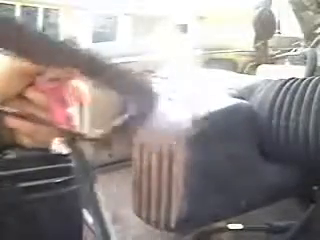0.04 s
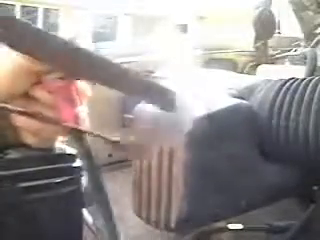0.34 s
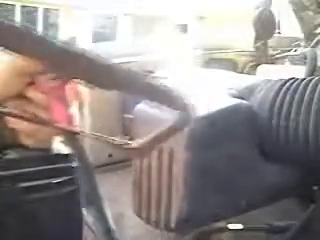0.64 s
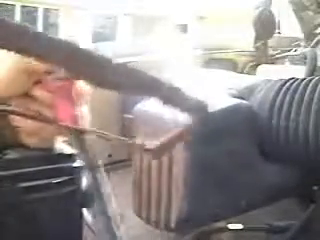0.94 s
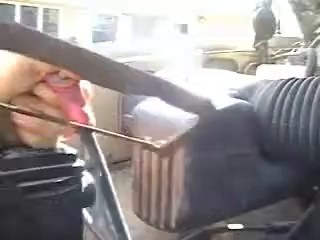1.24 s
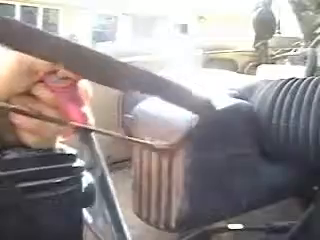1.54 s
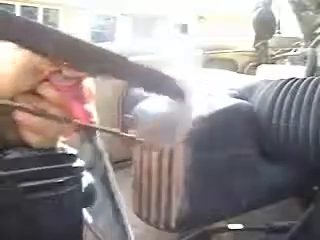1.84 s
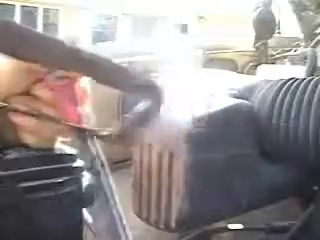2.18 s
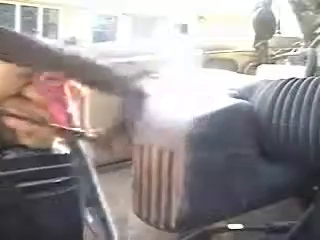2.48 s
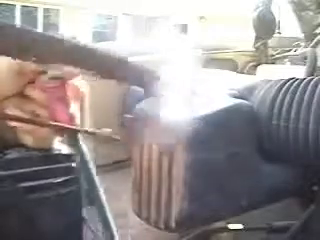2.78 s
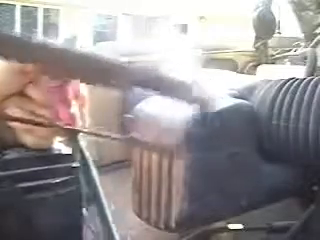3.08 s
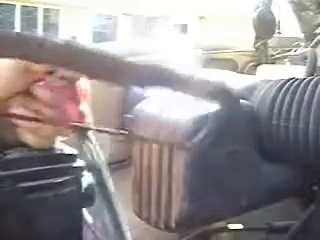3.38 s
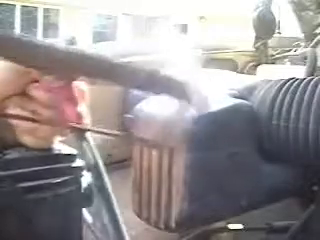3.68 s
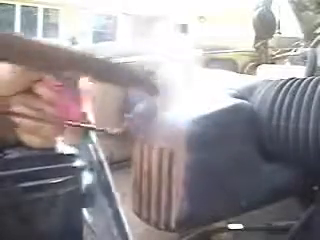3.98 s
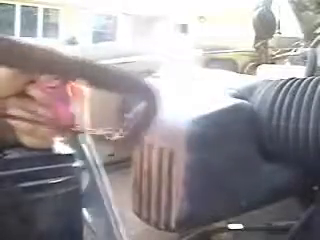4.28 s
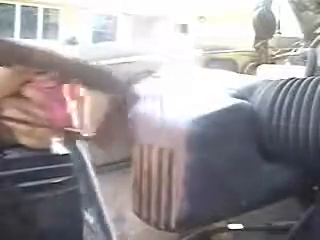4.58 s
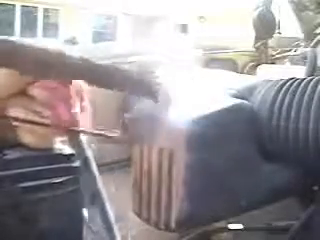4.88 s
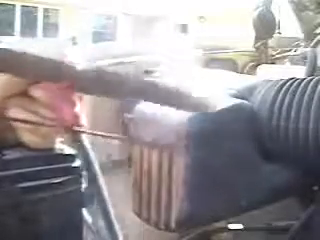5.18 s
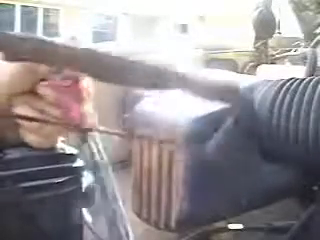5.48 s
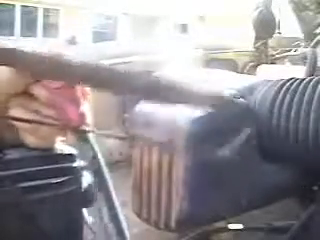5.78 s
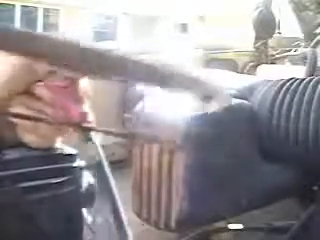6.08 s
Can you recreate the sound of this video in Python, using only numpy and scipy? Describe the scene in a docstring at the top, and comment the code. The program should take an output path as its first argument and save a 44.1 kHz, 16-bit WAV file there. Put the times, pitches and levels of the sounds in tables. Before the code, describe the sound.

A hand hacksaw cuts a steel cable fitting from the very start, close and straight ahead, about three strokes out and three back each second. The teeth make a gritty metallic rasp, with a low groan on the pulls. During the first three seconds the blade sticks at some turns and breaks free with thin, sudden scrapes. At about 0.4, 2.1 and 2.9 seconds the saw knocks a hollow plastic housing, which thuds and booms briefly, the last time more softly. Short high squeaks come near the start, just before 2 seconds, and around 5 to 6 seconds. The taut blade rings on after some strokes, most clearly near 1.9, 2.3 and 3.7 seconds. From 3 seconds the sawing runs evenly and a little louder, its high ring growing, until the end at about 6.5 seconds. Quiet driveway air and a faint hum lie underneath.

```python
"""Over quiet driveway air, a hand hacksaw cuts a steel cable fitting, about three strokes out and three
back each second. The teeth rasp through the resonances of the work, which squeaks now and then and
groans on the pulls; the taut blade sings on after some strokes. In the first three seconds the blade
sticks and scrapes free at some turns, and three times the frame knocks a hollow plastic housing, which
booms. The sawing carries on to the end, its strongest resonance growing as the cut deepens."""
import sys
import numpy as np
from scipy import signal
from scipy.fft import rfft, irfft
from scipy.io import wavfile
from scipy.ndimage import uniform_filter1d

SR = 44100
rng = np.random.default_rng(int(sys.argv[2]) if len(sys.argv) > 2 else 0)


def master_out(mix):
    """Clip the mix to full scale and print it as 16-bit PCM to the path in sys.argv[1]."""
    frames = np.transpose(np.atleast_2d(mix))
    ceiling = np.clip(frames, -1, 1)
    pcm = np.round(ceiling * 32767).astype(np.int16)
    wavfile.write(sys.argv[1], SR, pcm)


N = 279153
TIME = np.arange(N) / SR
BINS = np.fft.rfftfreq(N, 1 / SR)

# saw strokes, pull and push in turn: crest t/s, level/dB, length/s, body/dB (full or thin)
SAW_STROKES = [(0.006, -19, 0.073, -0.5), (0.205, -20.0, 0.074, 1), (0.362, -20, 0.073, 2.0),
               (0.555, -24.5, 0.077, -7), (0.72, -24.5, 0.082, 2.5), (0.894, -25.5, 0.084, -6),
               (1.047, -25.5, 0.097, 1), (1.227, -27, 0.091, -1.5), (1.372, -25, 0.1, 0.5),
               (1.567, -22, 0.086, 2.5), (1.711, -19, 0.08, -2), (1.915, -18, 0.077, 1),
               (2.059, -20, 0.092, 0.0), (2.259, -23, 0.097, 3), (2.43, -21, 0.08, -1.0),
               (2.632, -22.5, 0.078, -3), (2.771, -19.5, 0.11, 0.5), (2.975, -16.0, 0.1, -3),
               (3.141, -18, 0.074, 0.0), (3.338, -19.5, 0.092, 1.5), (3.488, -21.0, 0.091, 0.0),
               (3.689, -17, 0.091, 0.5), (3.845, -17.5, 0.076, -1.5), (4.023, -16, 0.077, -1.5),
               (4.184, -19.5, 0.083, -1.5), (4.369, -21.0, 0.087, 2), (4.513, -20.0, 0.072, -0.5),
               (4.693, -18.5, 0.084, 0.5), (4.845, -20.5, 0.1, -1.5), (5.039, -18.5, 0.086, 1),
               (5.19, -21.5, 0.1, -2), (5.387, -17.5, 0.088, 1), (5.547, -20, 0.1, -3.5),
               (5.742, -16.5, 0.085, 1), (5.897, -16.5, 0.097, -3.0), (6.088, -18, 0.095, 1),
               (6.259, -18.0, 0.097, -4.0)]
# the blade sticks, then breaks free: release t/s, level/dB, t60/s, time stuck/s
BLADE_CATCHES = [(0.309, -26, 0.042, .015), (0.5, -30, .08, 0.05), (0.651, -31, 0.12, 0.02),
                 (0.841, -28, 0.15, 0.037), (1.183, -21.5, 0.19, .045), (1.648, -22.5, 0.04, 0.016),
                 (1.847, -30, 0.062, 0.032), (2.197, -25, 0.099, 0.057), (2.923, -19.5, 0.072, 0.042)]
# the frame hits the housing: t/s, ring/dB, thud/dB, thud cut-off/Hz, bass/dB
FRAME_KNOCKS = [(0.432, -6, -11, 1680, 2), (2.1195, -7.5, -5.5, 2240, 0), (2.8591, -13.5, -13.5, 649, -5)]


def amp(db):
    """Decibels to gain."""
    return 10 ** (np.asarray(db) / 20)


def unit_rms(x):
    """Scales to rms 1."""
    return x / np.sqrt(np.mean(x ** 2) + 1e-20)


def curve(points, hz):
    """Reads a breakpoint curve on a log-frequency axis."""
    f, value = np.transpose(points)
    return np.interp(np.log(hz + 1), np.log(f + 1), value)


def add(mix, s, sound):
    """Mixes a sound in at s seconds."""
    part = mix[max(round(s * SR), 0):][:len(sound)]
    part += sound[:len(part)]


def eq(x, gain):
    """Zero-phase EQ with a gain for each of BINS."""
    return irfft(rfft(x) * gain, N)


def noise(colour):
    """Noise of rms 1, coloured by a gain for each of BINS."""
    return unit_rms(eq(rng.standard_normal(N), colour))


def wander(hz):
    """Random modulation of rms 1, up to about hz."""
    knots = np.arange(0, N / SR + 1, .5 / hz)
    return unit_rms(np.interp(TIME, knots, rng.standard_normal(len(knots))))


def below(hz):
    """Smooth low-pass gain for each of BINS."""
    return 1 / (1 + (BINS / hz) ** 6)


def bell(hz, centre, width):
    """Resonance curve of height 1."""
    return 1 / (1 + (2 * (hz - centre) / width) ** 2)


def driveway(air_db=-44, hum_hz=114, hum_db=-55):
    """A bed of low outdoor air and a faint wavering hum."""
    # colour of the air: f/Hz, level/dB
    air_colour = [(20, -23), (60, -3), (115, -2), (160, 0.5), (280, 0), (450, 1), (900, -14.5), (3000, -15),
                  (12000, -31.5)]
    air = noise(amp(curve(air_colour, BINS)))
    hum = np.sqrt(2) * np.sin(2 * np.pi * np.cumsum(hum_hz + 3 * wander(28)) / SR)
    return amp(air_db) * air + amp(hum_db) * hum


def teeth(mid_stroke_hz=1368, tooth_share=0.18, grit_db=4):
    """Teeth strike at a rate that follows the saw's speed; chips tear off at random between them."""
    crests = [row[0] for row in SAW_STROKES]
    crests.append(2 * crests[-1] - crests[-2])
    stroke = np.interp(TIME, crests, np.arange(len(crests)))
    speed = np.cos(np.pi * stroke) ** 2
    passed = np.cumsum(mid_stroke_hz * speed * (1 + .12 * wander(5) + .13 * wander(400))) / SR
    clicks = np.diff(np.floor(passed), prepend=0)
    strikes = clicks * amp(grit_db * rng.standard_normal(N)) * np.sqrt(speed)
    chips = rng.standard_normal(N) * amp(2 * wander(1030))
    chip_share = 1 - 2 * tooth_share * speed
    return np.sqrt(tooth_share) * unit_rms(strikes) + np.sqrt(chip_share) * unit_rms(chips)


def shifting_contact(x, flare_db=2.7):
    """The contact slides along the blade, and different pitches flare and fade in turn."""
    spectra = signal.stft(x, nperseg=1024, noverlap=768)[2]
    patches = uniform_filter1d(rng.standard_normal(spectra.shape), size=3, axis=0)
    patches = uniform_filter1d(patches, size=6, axis=1)
    return signal.istft(spectra * amp(flare_db * unit_rms(patches)), nperseg=1024, noverlap=768)[1][:N]


def steel(x, size=16384):
    """Blade and work ring after each click, their resonances standing on a broad colour."""
    # broad colour of the rasp: f/Hz, level/dB
    colour = [(60, -39.5), (250, -12.5), (420, -5), (540, 1), (950, -1), (1250, 0), (2100, 0), (2700, -4.5),
              (3600, -5), (4600, -1), (6500, -5), (7400, -5), (10000, -6.5), (12000, -16)]
    # resonances of blade and work: f/Hz, width/Hz, height above the colour/dB
    resonances = [(791, 30, 11), (1400, 14, 7), (1700, 37, 4), (2052, 33, 6.5), (2247, 14.4, 13.5),
                  (2448, 29, 7.5), (2800, 43, 4.5), (3360, 49, 3), (3329, 52, 16.5), (3370, 28, 11),
                  (3640, 81, 3.5), (3983, 95, 6.5), (4350, 38, 9.5), (4720, 27, 10.5), (4780, 93, 0),
                  (6000, 95, 7.5), (6360, 48, 6), (6690, 24, 12.5), (7710, 40, 4.5)]
    hz = abs(np.fft.fftfreq(size, 1 / SR))
    peaks = sum((amp(db) ** 2 - 1) * bell(hz, f, width) for f, width, db in resonances)
    log_gain = np.log(amp(curve(colour, hz)) * np.sqrt(1 + peaks))
    impulse = np.fft.ifft(np.exp(np.conj(signal.hilbert(log_gain)))).real  # minimum phase
    return signal.oaconvolve(x, impulse[:size // 2])[:N]


def grip(x, hz=3370, width_hz=120, loose_db=-2.5, full_grip_s=4.9):
    """The deepening cut grips the blade, and its strongest resonance grows."""
    band = eq(x, bell(BINS, hz, width_hz))
    looseness = np.maximum(1 - TIME / full_grip_s, 0)
    return x + band * (amp(loose_db * looseness) - 1)


def stroke_envelope(pull_db, push_db, lag, stretch, body_share, fall_db=26, roundness=0.83, turn_db=-51):
    """Gain of one rasp band: each stroke skids, bites and rounds off, a pull more abruptly."""
    pull, push = (0.41, pull_db, -4.5), (0.54, push_db, -1.5)  # attack share, level/dB, skid/dB
    t = TIME[::40]
    power = np.full(len(t), amp(turn_db) ** 2)  # the blade still rubs as it turns round
    for k, (s, db, length, body_db) in enumerate(SAW_STROKES):
        attack, way_db, skid_db = push if k % 2 else pull
        since = (t - s - lag) / (length * stretch)
        from_crest = since / np.where(since < 0, attack, 1 - attack)
        fade_db = fall_db * (np.hypot(from_crest, roundness) - roundness)
        bite_s = s - 0.2 * length
        skidding = np.clip((bite_s - t) / .003, 0, 1)
        power += amp(db + way_db + body_share * body_db + skid_db * skidding - fade_db) ** 2
    return np.interp(TIME, t, np.sqrt(power))


def sticking(duck_db=-6):
    """Gain that ducks the rasp while the blade is stuck, just before each catch."""
    stuck = sum((TIME > s - wait) & (TIME < s) for s, *_, wait in BLADE_CATCHES)
    return amp(duck_db * uniform_filter1d(stuck.astype(float), size=130))


def rasp(level_db=3.5, uneven_db=1.49):
    """The teeth ring the steel; four bands swell and fade with the strokes."""
    # judder, grind, hiss, fizz: top f/Hz, pull/dB, push/dB, lag/s, length factor, share of body
    bands = [(883, -1, -7.5, 0.0062, 1.31, 2.25), (2830, 0.5, 1, 0.0011, 1.107, 0.44),
             (7000, -1.5, -1.5, -0.00062, 1.007, 0), (18500, -2, 0, -0.0072, 1.23, -0.42)]
    cut = unit_rms(grip(steel(shifting_contact(teeth()))))
    out, lower = np.zeros(N), 0
    for edge_hz, *response in bands:
        upper = below(edge_hz)
        out += eq(cut, upper - lower) * stroke_envelope(*response)
        lower = upper
    return amp(level_db + uneven_db * wander(39)) * sticking() * out


def squeaks(level_db=-1.5, waver_hz=14, flutter_db=2):
    """The teeth lock onto one resonance: an unsteady tone swells and dies within a stroke."""
    # squeaks of the steel: peak t/s, f/Hz, level/dB, length/s
    cues = [(0.011, 4270, -24, .04), (0.205, 4350, -19.5, .04), (.569, 4310, -27, .028),
            (0.92, 4400, -28.5, .04), (1.256, 4370, -35, .04), (1.708, 3294, -15, .022),
            (1.928, 3287, -18.5, .03), (5.032, 1374, -19, .03), (5.039, 3324, -18, .03),
            (5.191, 3351, -26.5, .045), (5.75, 1234, -20.5, .027), (6.247, 3349, -20, .03)]
    drift = waver_hz * wander(134)
    flutter = amp(flutter_db * wander(250))
    out = np.zeros(N)
    for s, hz, db, length in cues:
        near = abs(TIME - s) < 2 * length
        swell = np.exp(-(2 * (TIME[near] - s) / length) ** 2)
        tone = np.sqrt(2) * np.sin(2 * np.pi * np.cumsum(hz + drift[near]) / SR)
        out[near] += amp(db + level_db) * swell * tone
    return out * flutter


def groans(level_db=-7.5, lag_s=0.02, length_s=0.063, effort_share=0.31, usual_db=-20):
    """Each pull drags the work along and it groans late in the stroke, more on a hard, full one."""
    # low resonances of the work: f/Hz, width/Hz, level/dB
    resonances = [(547, 84, -5), (790, 46, 2.5)]
    envelope, t = np.zeros(N), TIME[:SR // 4]
    for s, db, _, body_db in SAW_STROKES[::2]:
        start = max(s - .1, 0)
        swell = np.exp(-(2 * (t + start - s - lag_s) / length_s) ** 2)
        effort_db = usual_db + effort_share * (db - usual_db)
        add(envelope, start, amp(effort_db + body_db + level_db) * swell)
    return envelope * noise(sum(amp(db) * bell(BINS, hz, width) for hz, width, db in resonances))


def blade_ring(hz=2270, t60=0.55, level_db=-1.5, rise_10db_s=0.0093, lag_s=0.034):
    """Every stroke pumps the taut blade's mode a little, some a lot; it rings on through the turn."""
    # the blade sings out: peak t/s, level/dB
    strong = [(.21, -31.5), (1.57, -28.5), (1.923, -20), (2.285, -20.5), (2.635, -29), (3.703, -18),
              (4.037, -26.5), (4.704, -28), (5.405, -31), (5.752, -31.5), (5.941, -25)]
    faint = [(s + lag_s, db - 17 + 3 * rng.standard_normal()) for s, db, *_ in SAW_STROKES]
    power, t = np.zeros(N), TIME[:SR]
    for peak, db in strong + faint:
        start = max(peak - .1, 0)
        since = t + start - peak
        envelope_db = np.where(since < 0, 10 * since / rise_10db_s, -60 * since / t60)
        add(power, start, amp(db + envelope_db) ** 2)
    phase = 2 * np.pi * np.cumsum(hz + 1.51 * wander(10.9)) / SR
    return amp(level_db) * np.sqrt(2 * power) * np.sin(phase)


def catches(low_shelf_hz=5200, rise_s=0.00092):
    """The stuck blade breaks free with a thin, sudden scrape."""
    scrape = unit_rms(eq(steel(rng.standard_normal(N)), 1.08 - below(low_shelf_hz)))
    envelope, t = np.zeros(N), TIME[:SR // 4]
    for s, db, t60, _ in BLADE_CATCHES:
        add(envelope, s, amp(db - 60 * t / t60) * (1 - np.exp(-t / rise_s)))
    return scrape * envelope


def thud(samples, cut_hz):
    """The rattling thud of a blow: a noise burst whose treble dies first."""
    # colour of the thud: f/Hz, level/dB
    spectrum = [(20, -33), (75, -24), (150, -16.5), (300, 3), (550, 5.5), (900, -4.5), (2500, -1.5),
                (12000, -2)]
    # its decay: f/Hz, t60/s
    decay_times = [(50, 0.13), (250, 0.2), (600, 0.11), (1500, 0.078), (8000, 0.027)]
    hz, age, spectra = signal.stft(rng.standard_normal(samples), SR, nperseg=256)
    colour = amp(curve(spectrum, hz)) / np.sqrt(1 + (hz / cut_hz) ** 4)
    decay = amp(-60 * age / curve(decay_times, hz)[:, None])
    burst = signal.istft(spectra * colour[:, None] * decay, SR, nperseg=256)[1][:samples]
    return burst / np.std(burst[:SR // 50])


def knocks(ring_trim_db=-1, rise_s=0.00031, bass_hz=300):
    """The saw frame strikes the housing and rings its modes, under a short thud."""
    # modes of the plastic housing: f/Hz, level/dB, t60/s
    modes = [(199.2, -6, 0.25), (281.3, -9.5, 0.3), (342, -0.5, 0.087), (412, -1.5, 0.15), (469, -1, 0.12),
             (565, -3, 0.17), (800, -9, 0.063), (940, -3.5, 0.06), (1120, -7.5, 0.092)]
    out, t = np.zeros(N), TIME[:SR * 3 // 4]
    for s, ring_db, thud_db, cut_hz, bass_db in FRAME_KNOCKS:
        ring = sum(amp(db - 60 * t / t60) * np.sin(2 * np.pi * (hz * t + rng.random()))
                   for hz, db, t60 in modes)
        blow = amp(ring_db + ring_trim_db) * ring + amp(thud_db) * thud(len(t), cut_hz)
        bass = signal.filtfilt(*signal.butter(2, bass_hz, fs=SR), blow, padtype=None)
        add(out, s, (blow + (amp(bass_db) - 1) * bass) * (1 - np.exp(-t / rise_s)))
    return out


def boom(level_db=-14, t60=0.55, rise_s=0.0039):
    """The hollow space round the housing goes on booming after each knock."""
    # colour of the hollow space: f/Hz, level/dB
    colour = [(40, -29), (110, -7), (180, -3), (550, -8), (750, -18), (2000, -39), (10000, -79)]
    envelope, t = np.zeros(N), TIME[:SR]
    for s, db, *_, bass_db in FRAME_KNOCKS:
        add(envelope, s, amp(db + bass_db + level_db - 60 * t / t60) * (1 - np.exp(-t / rise_s)))
    return envelope * noise(amp(curve(colour, BINS)))


def reflections(x, t60=0.1):
    """Close surfaces scatter the sound for a few hundredths of a second."""
    t = TIME[:SR // 10]
    impulse = rng.standard_normal(len(t)) * amp(-60 * t / t60)
    return signal.oaconvolve(x, impulse / np.linalg.norm(impulse))[:N]


def scene(scatter_db=-2, echo_db=-8.5):
    """The saw is straight ahead; scattered rasp and reflections widen it, and its ring leans left."""
    # reflections that differ between the ears: f/Hz, side level/dB
    width = [(50, -9), (250, -10.5), (550, -11), (1100, -7.5), (2200, -5.5), (4500, -6), (10000, -5.5)]
    # stereo balance: f/Hz, left minus right/dB
    balance = [(60, -4), (250, 0), (1500, 0), (2300, 2.5), (3300, 3), (4500, 0.5), (8000, -.5),
               (12000, -0.5)]
    direct = rasp() + squeaks() + groans() + catches() + knocks()
    mid = direct + blade_ring() + boom() + driveway()
    scattered = rasp() + boom() + driveway()  # fresh noise, decorrelated from the mid
    side = amp(scatter_db) * scattered + amp(echo_db) * reflections(direct)
    side = eq(side, amp(curve(width, BINS)))
    lean = amp(curve(balance, BINS) / 2)
    return np.array([eq(mid + side, lean), eq(mid - side, 1 / lean)])


def record(dry, motor_hz=149.85, notch_depth=0.73, feedback=0.63, ceiling=0.97, top_hz=12300):
    """The recorder notches out the multiples of its motor tone, rounds off peaks and limits the band."""
    delay = np.exp(-2j * np.pi * BINS / motor_hz)
    comb = 1 - notch_depth * (1 - feedback) * delay / (1 - feedback * delay)
    rounded = ceiling * np.tanh(eq(dry, comb) / ceiling)
    lowpass = signal.firwin(301, top_hz, window=("kaiser", 9), fs=SR)
    return signal.oaconvolve(rounded, lowpass[None], "same")


dry = scene()
out = record(dry)
master_out(out)
```